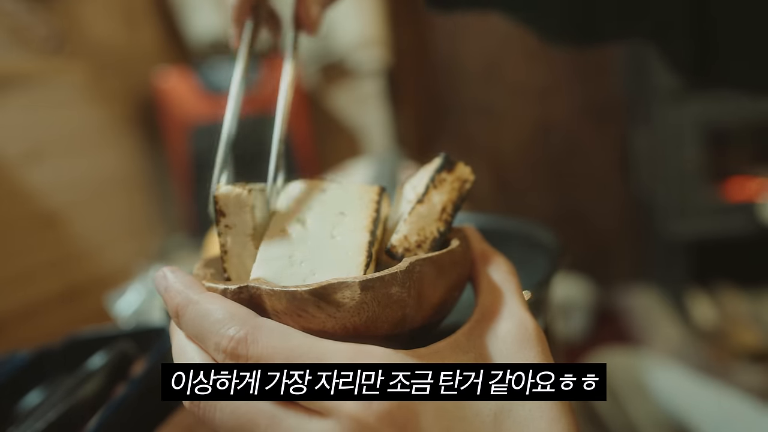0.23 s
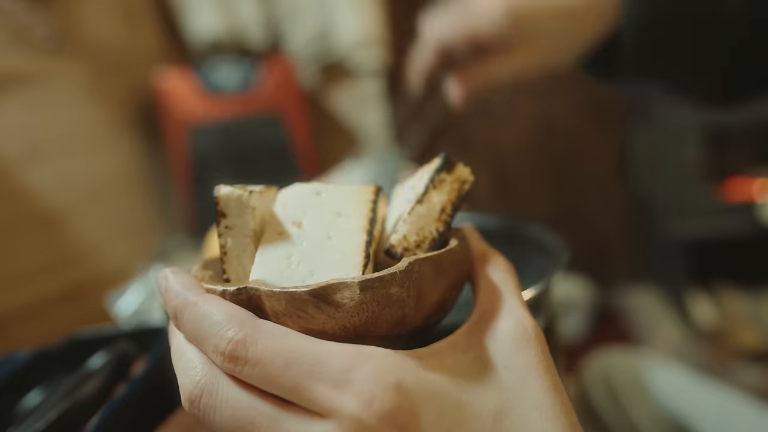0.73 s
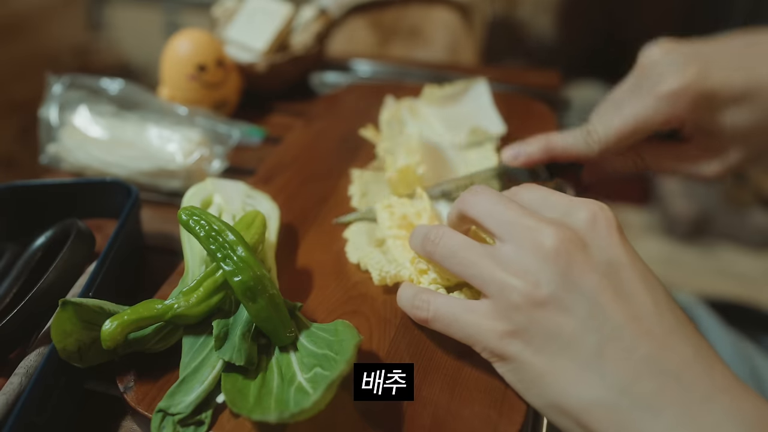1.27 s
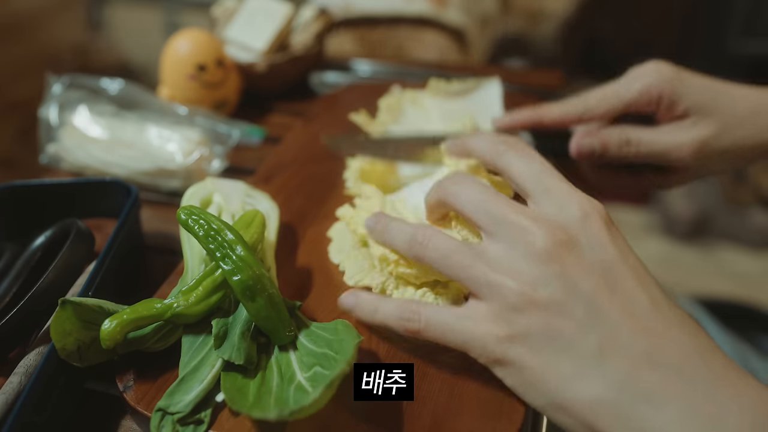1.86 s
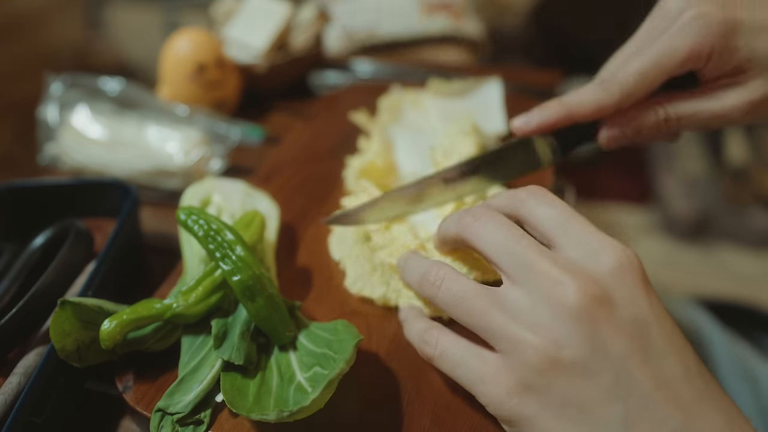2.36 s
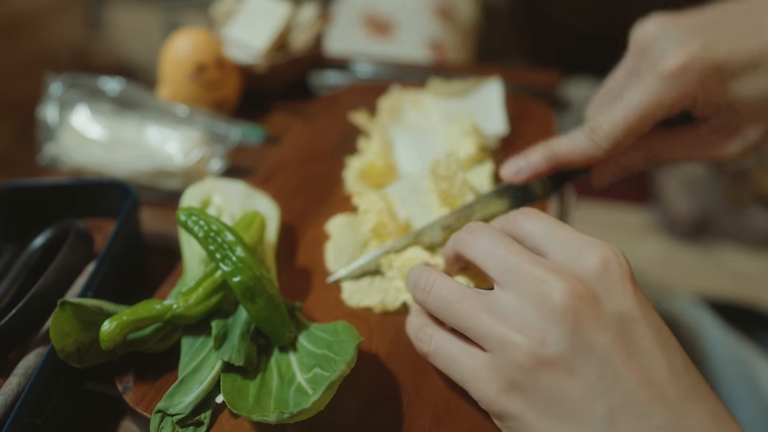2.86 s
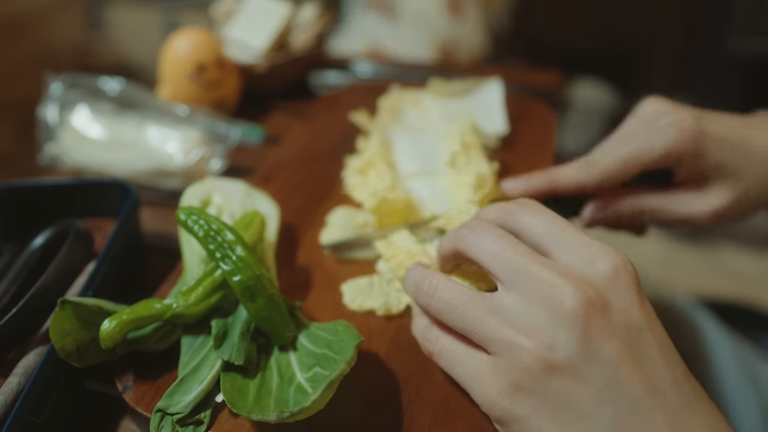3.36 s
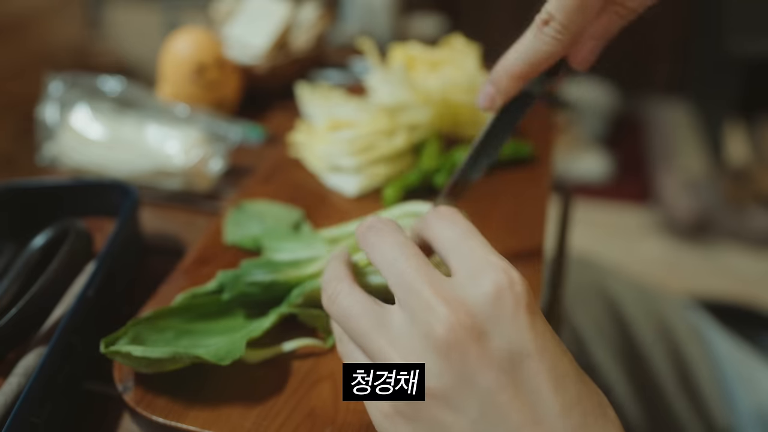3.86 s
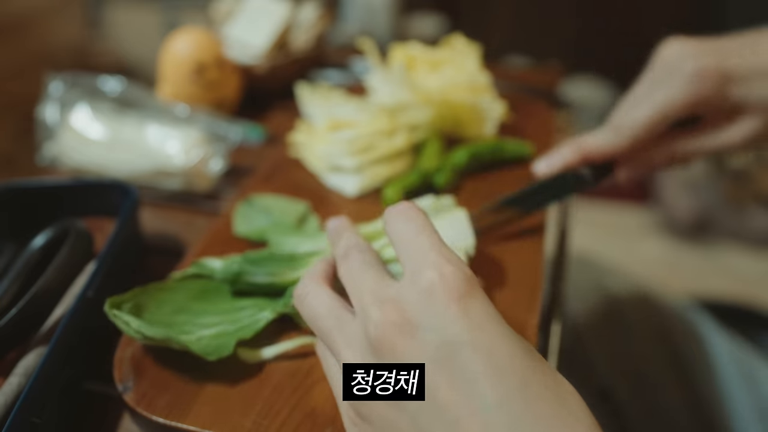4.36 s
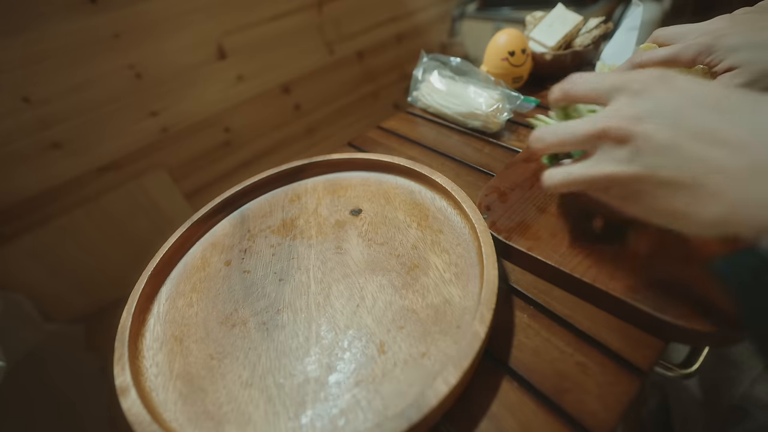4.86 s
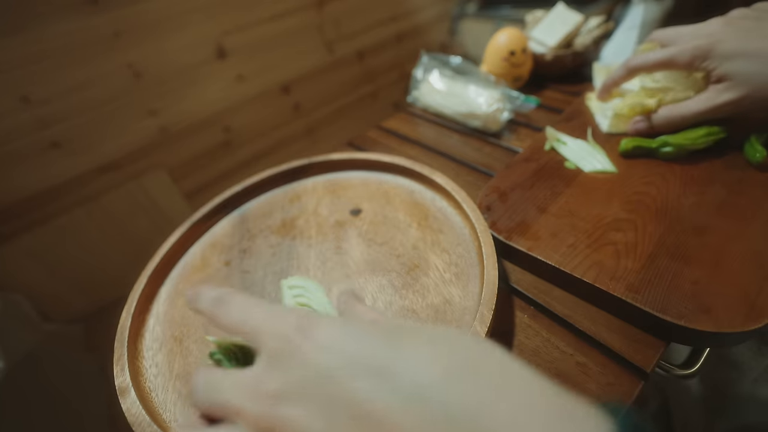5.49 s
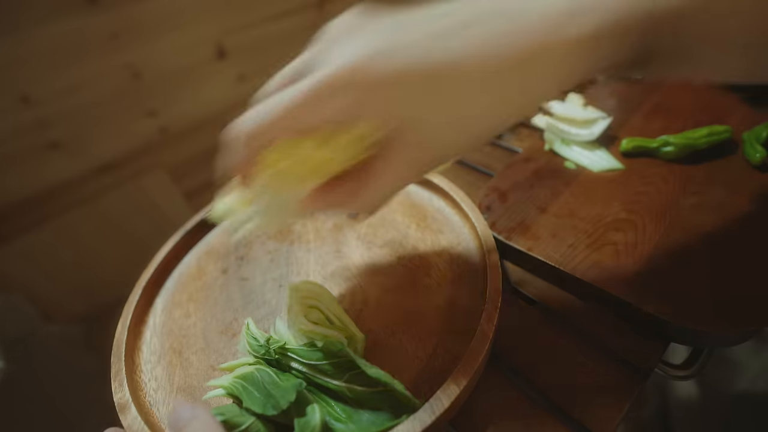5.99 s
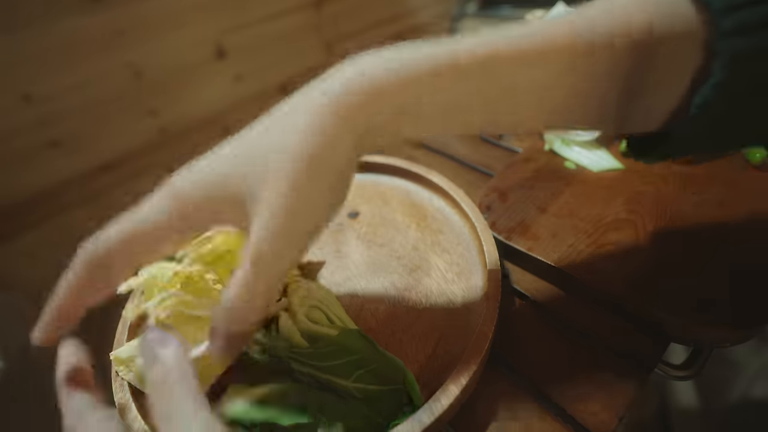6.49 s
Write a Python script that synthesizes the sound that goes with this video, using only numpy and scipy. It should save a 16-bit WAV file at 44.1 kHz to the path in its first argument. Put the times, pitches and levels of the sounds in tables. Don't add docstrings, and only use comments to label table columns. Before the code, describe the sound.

A close, dry microphone in a small kitchen with low rumble, soft hiss and faint motor whine. From 0 to 0.8 s steel tongs tick delicately, with tiny dry crumb cracks and a soft bowl tap near 0.36. At 0.9 a knife bites crisp cabbage: loud, dense, wet crackling until about 1.5, with light board knocks and low table boom. Smaller creaks fade by 1.9; a steel scrape marks 2.07, then faint cuts. At 2.7 a sharp snap and knock start another strong crunch lasting to 3.1. Quieter, brighter rasps through green stems build to a hard chop and knock at 3.8, then crunches and a solid, ringing board hit around 4.15. After 4.5 leaves rustle quietly as they are gathered. Around 5.45 to 5.55 a handful thumps softly on a wooden plate, a crisp rustle follows at 5.77, and sparse leafy crackles settle until 6.7.

```python
import sys
import numpy as np
from scipy import signal
from scipy.fft import rfft, irfft, next_fast_len
from scipy.io import wavfile
from scipy.ndimage import uniform_filter1d

SR = 44100
rng = np.random.default_rng(int(sys.argv[2]) if len(sys.argv) > 2 else 0)


def transcribe(signal):
    frames = np.atleast_2d(signal).T
    limited = np.clip(frames, -1, 1)
    pcm = np.round(limited * 32767).astype(np.int16)
    wavfile.write(sys.argv[1], SR, pcm)


def field_ratio(decibels):
    return 10 ** (np.asarray(decibels, dtype=float) / 20)


N = 296784


def unit(x):
    return x / np.sqrt(np.mean(x ** 2, axis=-1, keepdims=True) + 1e-20)


def along(points, hz):
    f, v = np.transpose(points)
    return np.interp(np.log(hz + 1), np.log(f + 1), v)


def curves(rows):
    start_s, *columns = np.transpose(rows)
    row = np.searchsorted(start_s, np.arange(N) / SR, side="right") - 1
    return [c[np.clip(row, 0, None)] for c in columns]


def filtered(x, response):
    size = next_fast_len(N + SR // 2)
    return irfft(rfft(x, size) * response(np.fft.rfftfreq(size, 1 / SR)), size)[..., :N]


def noise(spectrum):
    return unit(filtered(rng.standard_normal(N), lambda hz: field_ratio(along(spectrum, hz))))


def bump(hz, centre_hz, octaves):
    return np.exp(-(np.log2(hz / centre_hz) / octaves) ** 2)


def resonances(modes, mid_db=0, hard_db=0):
    def response(f):
        total = 0
        for k, (centre, width, db) in enumerate(modes):
            lift = field_ratio(along([(350, 0), (500, mid_db), (650, mid_db), (1200, hard_db)], centre))
            ring = 1j * f * width / (centre ** 2 - f ** 2 + 1j * f * width)
            total = total + (-1) ** k * field_ratio(db) * lift * ring
        return total
    return response


def placed(times_s, rows):
    at = np.round(np.asarray(times_s) * SR).astype(int)[:, None] + np.arange(rows.shape[1])
    return np.bincount(at.ravel(), rows.ravel(), N + SR)[:N]


def bursts(times_s, db, colour, t60_s, rise_s, size, peak=False):
    t = np.arange(size) / SR
    raw = rfft(rng.standard_normal((len(times_s), size)))
    tone = unit(irfft(raw * colour(np.fft.rfftfreq(size, 1 / SR) + 1), size))
    shaped = tone * field_ratio(-60 * t / t60_s) * (1 - np.exp(-t / rise_s))
    if peak:
        shaped = shaped / np.abs(shaped).max(axis=1, keepdims=True)
    return placed(times_s, field_ratio(db)[:, None] * shaped)


# blade bites in s, full pressure in s, crunch in dB, 20 dB fade in s,
# fizz above the crunch in dB.
CUTS = [(0.906, 0.942, -29.5, 0.17, -0.5), (1.121, 1.333, -23, 0.1479, -1), (1.529, 1.553, -35, 0.17, -11),
        (1.604, 1.832, -43.5, 0.1676, -1.5), (2.14, 2.195, -48.5, 0.02, -14.5), (2.294, 2.31, -54, 1, -6),
        (2.495, 2.715, -52, 0.53, 7), (2.721, 2.724, -26.5, 0.0661, -3.5),
        (2.845, 3.001, -22.5, 0.1024, -2.5), (2.99, 3.064, -23, 0.0156, -4),
        (3.144, 3.467, -43.5, 0.0714, 0), (3.529, 3.654, -41, -0.23, 5), (3.732, 3.79, -21.5, -0.0155, 2.5),
        (3.911, 4.077, -29.5, 0.2373, 1.5), (4.132, 4.134, -23.5, 0.07, 0),
        (4.153, 4.215, -31.5, 0.0935, 0), (4.286, 4.323, -39, -0.1, 6), (4.347, 4.5, -49.5, -0.26, 9.5)]
# grip in s, then the same columns.
GRIPS = [(0.011, 0.057, -51.5, 0.06, 5.5), (0.165, 0.238, -61.5, 0.26, 5), (0.723, 0.732, -60.5, 0.13, -14),
         (4.546, 4.636, -47, 0.51, -6), (5.043, 5.023, -48.5, 0.3461, -2.5), (5.332, 5.435, -48, 0.22, -3),
         (5.44, 5.723, -48, -0.22, 1), (5.768, 5.785, -37.5, 0.0661, -1), (5.927, 6.077, -54, 0.3143, -2.5),
         (6.2, 6.247, -42.5, 0.45, -2.5), (6.416, 6.465, -55, -0.2, 3), (6.71, 6.725, -51.5, -2.5, 5)]


def pressure():
    swell_db, bite_20db_s = 11, 0.015
    t = np.arange(0, N + 32, 32) / SR
    crunch = fizz = 1e-9
    for start, full, db, fade_s, fizz_db in CUTS + GRIPS:
        loss = swell_db * np.clip((full - t) / max(full - start, 0.002), 0, 1)
        loss = loss + 20 * np.maximum(start - t, 0) / bite_20db_s
        loss = loss + 20 * np.maximum(t - full, 0) / abs(fade_s)
        power = field_ratio(2 * (db - np.minimum(loss, 120)))
        crunch = crunch + power
        fizz = fizz + power * field_ratio(2 * fizz_db)
    return [np.interp(np.arange(N) / SR, t, np.sqrt(power)) for power in (crunch, fizz)]


# start in s, sliding share 0-1, smoothness 0-1, blade singing in dB,
# room hiss in dB.
STAGES = [(0, 0, 0.42, -30, -54.5), (.89, 0.23, 0.24, -22, -64.5), (1.5, 0, 0.15, -24.5, -64),
          (1.9, 0.15, 0.29, -15, -72.5), (2.29, 0.25, 0.15, -24, -90), (2.84, 0.07, 0.13, -17, -83.5),
          (2.95, 0.07, 0.23, -11.5, -83), (3.3, 0.7, 0, -28, -88.5), (3.77, 0.9, 0.5, -9, -87),
          (3.87, 0.85, 0.45, -24, -85.5), (4.165, 0.2, 0.23, -2.5, -85.5), (4.27, 0.16, 0, -24, -84.5),
          (4.55, 0.04, 0, -33.5, -64.5), (5.44, 0.29, 0, -29, -68), (5.86, 0.09, 0.02, -19.5, -67)]
# start in s, peak in dB.
JOLTS = [(1.263, -30.5), (1.501, -35), (2.071, -37.5), (2.742, -32), (2.984, -29), (3.34, -36.5),
         (3.62, -32), (3.799, -16.5), (4.147, -26), (4.8, -42), (5.251, -40), (5.47, -30.5)]
# frequency in Hz, density in dB per Hz.
ROOM_HISS = [(82, -52.5), (140, -0.5), (264, -6), (1000, -11.5), (3580, -35), (4910, -26.5), (13800, -27),
             (16500, -25.5)]
# frequency in Hz, level in dB.
MOTOR_TONES = [(6751, -73), (13501, -76.5), (14250, -79)]
# table boom in dB, room rumble in dB; bowl held up, then at the board.
STILL_DB = [(-49, -47), (-68.5, -61.5)]
LEAN_DB = (-23.5, -18.5)
SWAY_DB = (-5, -13.5)


def kitchen(crunch):
    lag_s, lean_s, sway_t60_s, board_s = 0.057, 0.19, 0.61, 0.89
    hiss_db = curves(STAGES)[3]
    t = np.arange(N) / SR
    late = np.roll(crunch, int(lag_s * SR))
    lean = np.abs(uniform_filter1d(late ** 2, int(lean_s * SR) + 1))
    sway = sum(field_ratio(2 * (db - 60 * np.abs(t - s) / sway_t60_s)) * (t > s) for s, db in JOLTS)
    still = field_ratio(2 * np.where(t < board_s, *np.array(STILL_DB)[:, :, None]))
    power = still + np.outer(field_ratio(LEAN_DB) ** 2, lean) + np.outer(field_ratio(SWAY_DB) ** 2, sway)
    boom_gain, rumble_gain = np.sqrt(power)
    boom = noise([(18, -23), (28, 6.5), (38, 12.5), (48, 9), (60, -49.0)])
    rumble = noise([(45, -46.0), (58, 0.5), (95, -12.5), (125, -10.5), (160, -18), (300, -47.5)])
    whine = sum(field_ratio(db - 0.5) * np.sin(2 * np.pi * hz * t) for hz, db in MOTOR_TONES) * (t < board_s)
    return boom_gain * boom + rumble_gain * rumble + field_ratio(hiss_db) * noise(ROOM_HISS) + whine


# frequency in Hz, density in dB per Hz.
CRUNCH = [(410, -36), (830, -7.5), (1440, -9), (2400, -2), (4520, -5.5), (8000, -8), (10400, -64)]
FIZZ = [(3240, -31), (5500, 2.5), (7350, 5), (13800, 5.5), (15800, 1), (16600, -21)]
RASP = [(530, -31), (1000, -22.5), (2340, -8.5), (4370, 8.5), (6180, -6), (9000, -13.5), (11700, -28.5),
        (16000, -93.5)]
# frequency in Hz, width in Hz, level in dB.
BOARD = [(225.2, 31, 4), (525, 39, -3), (1050, 120, -15), (1535, 160, -21), (2110, 130, -8)]
PLATE = [(195, 55, -5.5), (338.6, 33.6, 1.5), (573.5, 28, 2), (694, 30.7, -9), (853, 44, -8.5),
         (1300, 104, -14), (1535, 80, -13), (2100, 310, -22.5)]


def leaves(crunch, fizz):
    board_rub_db, plate_rub_db, scuff_db = -19, -18, -19.5
    slide, smooth, sing_db, _ = curves(STAGES)
    luck = rng.random((5000, 4))
    at = (luck[:, 0] * N).astype(int)
    size_db = -4 * np.log(luck[:, 1] + 0.012)
    lean_db = 14 * (luck[:, 2] - 0.5)
    pitch_db = 15 * (luck[:, 3] - 0.5)
    age = np.arange(SR // 50) / SR

    def level(x):
        return x / np.sqrt(np.abs(uniform_filter1d(x ** 2, SR // 12)) + 1e-9)

    def grain(db, t60_s):
        fade = field_ratio(-60 * age / t60_s) * (1 - np.exp(-age / 0.00063))
        cracks = level(signal.fftconvolve(np.bincount(at, field_ratio(db), N), fade)[:N])
        return level(smooth + (1 - smooth) * cracks)

    body = np.sqrt(1 - slide) * noise(CRUNCH) + np.sqrt(slide) * noise(RASP)
    deep = filtered(body, lambda f: 1 / (1 + (f / 3200) ** 6))
    dull = grain(size_db - lean_db - pitch_db, 0.024) * deep
    dull = dull + grain(size_db + pitch_db, 0.01) * (body - deep)
    spray = noise(FIZZ)
    top = filtered(spray, lambda f: 1 / (1 + (9500 / (f + 1)) ** 8))
    bright = grain(size_db + lean_db - pitch_db, 0.0079) * (spray - top)
    bright = bright + grain(size_db + lean_db, 0.012) * top

    force = grain(size_db, 0.021) * rng.standard_normal(N)
    blade = unit(filtered(force, resonances([(2110, 75, 0)])))
    board = unit(filtered(force, resonances(BOARD[:1])))
    plate = unit(filtered(force, resonances(PLATE[:2])))
    on_board = np.arange(N) < 4.45 * SR
    low = np.where(on_board, field_ratio(board_rub_db) * board, field_ratio(plate_rub_db) * plate)
    scuff = unit(filtered(force, lambda f: bump(f + 1, 444, 0.79)))
    rub = (1 + 2.56 * slide) * low + field_ratio(scuff_db) * (2 - slide) * scuff
    return field_ratio(-2.5) * (crunch * (dull + field_ratio(sing_db) * blade + rub) + fizz * bright)


# start in s, peak in dB, centre in Hz, brightness in dB.
CRUMBS = [
    (0.0418, -28, 3109, -17),
    (0.1728, -27, 6631, -19.5),
    (0.222, -36, 4270, 3.5),
]
FIRST_RIBS = [(0.9004, -18, 3420, -13), (0.902, -20, 4660, -17.5), (0.9162, -16.5, 2110, -7.5),
              (0.9436, -3, 9820, -18.5), (0.998, -13, 11600, -12), (1.0104, -17, 1200, -15),
              (1.0097, -6, 2000, -17), (1.017, -10.5, 4270, -3), (1.0611, -18, 5840, -9.5),
              (1.0979, -24, 5700, -15.5), (1.1116, -16, 2560, -12.5), (1.1327, -6.5, 5090, -21),
              (1.1563, -13, 3760, -12), (1.1692, -18, 7280, -2), (1.1698, -7, 2104, -12),
              (1.1887, -9, 4700, -21), (1.2017, -8.5, 2060, -16.5), (1.2165, -4, 2360, -22),
              (1.259, -3, 3900, -13), (1.278, -10.5, 4110, -20), (1.2973, -7.5, 4450, -13.5),
              (1.3152, -6, 3900, -15), (1.3495, -8.5, 2860, -17.5), (1.3744, -4.5, 2600, -20),
              (1.4531, -11, 4180, -13.5), (1.463, -12.5, 8670, -14)]
SPLITS = [(1.2264, -7.5, 2800, -12), (1.3026, -4, 4460, -15), (1.5464, -18, 5800, -19),
          (1.5514, -12.5, 2680, -9), (1.5675, -17, 1826, -15), (1.6254, -21, 5050, -18),
          (1.938, -34, 1980, -17), (2.9241, -5.5, 2700, -11), (2.9698, -2.5, 2050, -16),
          (3.0308, -6.5, 2320, -17), (4.2934, -14.5, 4420, -15), (4.6769, -25, 4290, -16.5),
          (6.716, -34, 2780, -18)]
CREAKS = [(1.5357, -38.5, 1200, 1.5), (1.5365, -14.5, 5730, -13.5), (1.5602, -13, 5115, -7.5),
          (1.5927, -30, 1780, -18.5), (1.6174, -20, 4340, -17.5), (1.6575, -24.5, 4590, -21),
          (1.6893, -32, 1880, -19.5), (1.7198, -30.5, 2100, -20), (1.753, -30, 2650, -17),
          (1.7797, -33.5, 2680, -13), (1.8015, -32, 8290, -10.5), (1.8285, -21.5, 4600, -11),
          (1.8361, -23.5, 4230, -19), (1.9282, -51, 1200, -5), (1.9287, -28.5, 1840, -17.5),
          (1.9962, -29.5, 5900, -22), (2.0196, -39.5, 4960, -16.5), (2.064, -24, 1816, -53)]
SECOND_RIBS = [(2.1548, -30, 2070, -23), (2.1884, -35, 1990, -31), (2.1972, -34.5, 2370, -29),
               (2.2994, -40, 2980, -17.5), (2.3096, -37.5, 4270, -21), (2.3382, -38.5, 4610, -14.5),
               (2.345, -29, 3400, -14), (2.4235, -43.5, 2360, -19), (2.4216, -33, 2070, -33),
               (2.502, -31, 6860, -10), (2.5093, -38, 10900, -9.5), (2.5083, -27.5, 2020, -12),
               (2.5756, -26.5, 5580, -21.5), (2.591, -20, 2270, -14.5), (2.608, -24, 9170, -16),
               (2.6726, -47, 1200, 3.5), (2.6726, -31, 4310, -12.5), (2.69, -21.5, 2000, -1),
               (2.727, 1, 2140, -12.5), (2.782, -24, 4170, -12), (2.8168, -29, 7750, -11.5),
               (2.8306, -20.5, 2100, -7.5), (2.843, -9, 1930, -16.5), (2.8609, -7, 4400, -15.5),
               (2.877, -5.5, 2030, -8), (2.8984, -7.5, 7340, -19), (2.902, -7, 4120, -16.5),
               (2.9182, -2, 2050, -16.5), (2.941, -3, 2470, -12), (2.9574, 2, 2060, -11),
               (2.9918, -2, 2080, -13.5), (3.0165, -5, 2160, -8.5), (3.128, -33.5, 4980, -22),
               (3.139, -24, 4940, -27), (3.1953, -32.5, 11600, -13), (3.2066, -27, 7470, -12.5)]
STEMS = [(3.2085, -30.5, 7470, -13), (3.2612, -28.5, 6530, -14), (3.262, -22, 4730, -19),
         (3.2963, -26, 9130, -6), (3.314, -20, 10550, -9.5), (3.361, -20.5, 5700, -10),
         (3.388, -18.5, 5630, -16.5), (3.4564, -19, 2730, -23.5), (3.5148, -42.5, 4770, 2.5),
         (3.5283, -25, 8110, -13), (3.5735, -19.5, 10970, -11), (3.6114, -25.5, 9570, -8),
         (3.612, -16.5, 5660, -15.5), (3.6357, -22, 3420, -13), (3.6468, -14.5, 3640, -9.5),
         (3.7232, -16.5, 3640, -11.5), (3.73, -16.5, 3910, -11.5), (3.7548, -16.5, 3430, -13.5),
         (3.7611, -10.5, 3200, -10), (3.769, -6.5, 10200, -13.5), (3.8793, -23, 7400, -14),
         (3.9178, -36, 4220, -6), (3.932, -24, 3360, -11), (3.9516, -22.5, 3890, -10.5),
         (3.9653, -12.5, 4230, -16), (3.9835, -9, 4100, -8.5), (4.012, -14.5, 11050, -13),
         (4.0542, -18, 4510, -11), (4.076, -15.5, 3680, -12), (4.1352, -3, 4270, -16.5),
         (4.1457, -4, 1990, -24), (4.1868, -10.5, 2130, -11), (4.2847, -13, 10000, -12.5),
         (4.2871, -12.5, 4520, -15), (4.3147, -14.5, 9360, -14.5), (4.3732, -28.5, 5820, -12)]
GATHER = [(4.3733, -27, 5860, -15.5), (4.4036, -30, 9100, -8), (4.4397, -24, 9200, -11.5),
          (4.4886, -19.5, 9230, -3), (4.521, -32, 1560, -12.5), (4.6412, -29, 4090, -27.5),
          (4.6614, -23.5, 4300, -27), (4.6971, -20.5, 4090, -11), (4.759, -30, 1300, -24.5),
          (4.765, -30, 1460, -28), (4.846, -24.5, 1910, -16), (4.9121, -40, 8840, -5),
          (5.0178, -34, 7990, -8), (5.0248, -29, 12060, -11), (5.0253, -27, 6800, -11),
          (5.0694, -23.5, 8270, -9), (5.0954, -32.5, 3170, -10), (5.1205, -26.5, 10100, -10),
          (5.1765, -37.5, 4380, -10), (5.3334, -43, 8890, -13), (5.365, -41.5, 1800, -19.5),
          (5.365, -35, 1609, -25), (5.393, -33.5, 1490, -18), (5.4148, -32, 3340, -13),
          (5.4273, -19, 5760, -11), (5.4536, -31, 1210, -15.5)]
SETTLE = [(5.5623, -25.5, 4720, -23), (5.6136, -35, 2210, -15.5), (5.6281, -28, 11800, -14.5),
          (5.66, -25.5, 3670, -27), (5.687, -37, 8760, -14), (5.7088, -30, 7760, -18),
          (5.7268, -30, 6300, -13), (5.7318, -34, 6490, -11), (5.7722, -17.5, 6590, -19),
          (5.7844, -14.5, 5120, -18), (5.7907, -14, 7360, -17), (5.9504, -40.5, 2670, -6),
          (6.0024, -34, 3700, -10), (6.0224, -28, 4240, -9.5), (6.0508, -30, 7860, -10),
          (6.0741, -26, 9480, -16), (6.1145, -34.5, 3610, -13), (6.1876, -37, 2535, -19),
          (6.201, -26, 3860, -19.5), (6.2197, -26, 4420, -17), (6.2737, -27, 4330, -16.5),
          (6.2873, -18.5, 3430, -17), (6.353, -20.5, 4240, -16.5), (6.4335, -29.5, 4100, -14),
          (6.582, -30.5, 2900, -18.5), (6.6223, -32.5, 4080, -14.5), (6.6732, -38, 8820, -9),
          (6.6947, -47.5, 11960, 2), (6.7106, -35.5, 9810, 0.5), (6.7115, -27, 2800, -5)]


def snaps():
    rows = CRUMBS + SPLITS + FIRST_RIBS + CREAKS + SECOND_RIBS + STEMS + GATHER + SETTLE
    s, db, hz, bright_db = np.transpose(rows)[:, :, None]

    def colour(f):
        pitch = bump(f, hz, 0.18) + 0.47 * bump(f, 3040, 1.49)
        return pitch + 1.39 * field_ratio(bright_db) * bump(f, 10377, 0.97)

    t60_s = 0.0065 * (4000 / hz) ** 0.2
    crack = bursts(s[:, 0], db[:, 0] - 1.5, colour, t60_s, rise_s=0.00023, size=1024, peak=True)
    sing_db = curves(STAGES)[2]
    return crack + filtered(field_ratio(sing_db + 13.5) * crack, resonances([(2100, 100, 0.01)]))


# start in s, level in dB, centre in Hz, t60 in s.
SCRAPES = [(0.043, -17.5, 920, 0.08), (1.3, -17.5, 1763, 0.132), (1.749, -26, 902, 0.2),
           (1.79, -28, 880, 0.083), (2.064, -8.5, 1790, 0.14), (2.086, -5, 1298, 0.044),
           (3.368, -22, 870, 0.16), (4.524, -24.5, 1300, 0.1), (4.64, -23, 1500, 0.025),
           (4.659, -17, 1750, 0.025), (4.675, -21, 1300, 0.025), (4.696, -20, 1400, 0.026),
           (4, -19, 1546, 0.06), (6.61, -29.5, 1176, 0.18)]


def scrapes():
    s, db, hz, t60_s = np.transpose(SCRAPES)[:, :, None]

    def colour(f):
        return (2.62 * bump(f, hz, 0.18) + bump(f, 1140, 3.2)) / (1 + (f / 4600) ** 4)

    return bursts(s[:, 0], db[:, 0] - 16.0, colour, t60_s, rise_s=0.0023, size=8192)


# start in s, peak in dB, strongest frequency in Hz.
TONGS = [
    (0.0433, -31.5, 2800),
    (0.2182, -33.5, 3820),
    (0.3618, -43, 3020),
    (0.4444, -49, 3650),
    (0.5127, -43.5, 4442),
    (0.7233, -45.5, 2655),
]
# frequency in Hz, width in Hz, level in dB.
STEEL = [(900, 90, -12), (2466, 490, 4), (3020, 240, 0), (3650, 63, 1.5), (4230, 160, 3.5), (6000, 70, 2)]


def tongs():
    s, db, hz = np.transpose(TONGS)[:, :, None]
    touch = bursts(s[:, 0], db[:, 0] - 10, lambda f: bump(f, hz, 0.914),
                   t60_s=0.17, rise_s=0.00122, size=4096)
    return 0.63 * touch + field_ratio(2.5) * filtered(touch, resonances(STEEL))


def blows(rows, modes, contact_s, push_db):
    t = np.arange(SR // 5) / SR
    f = np.fft.rfftfreq(len(t), 1 / SR)
    rough = rng.standard_normal((len(rows), len(t)))
    drag = 0.15 * field_ratio(-0.3 * np.array(rows)[:, 3:])
    rattle = np.exp(-t / 0.025) * uniform_filter1d(rough, size=30, axis=1) * 2.35
    push = np.exp(-t / contact_s) * (1 + 0.72 * rough) + drag * rattle
    spot = rng.standard_normal((len(rows), len(modes), 2))
    rings = []
    for p, luck, (_, _, mid_db, hard_db) in zip(push, spot, rows):
        here = [(hz * (1 + 0.018 * a), width, db + 3.0 * b)
                for (hz, width, db), (a, b) in zip(modes, luck)]
        here.append((380, 450, -14))
        response = resonances(here, mid_db + 4, hard_db + push_db)(f)
        rings.append(irfft(rfft(p) * response, len(t)))
    peaks = field_ratio([row[1] for row in rows]) / np.abs(rings).max(axis=1)
    return placed([row[0] for row in rows], rings * peaks[:, None])


# start in s, peak in dB, middle ring in dB, hardness in dB.
DROPS = [(0.358, -29.5, -6, 4), (2.065, -42.5, -5.5, 14.5), (3.38, -32, -11, -3.5),
         (4.529, -34.5, -23, -11), (4.56, -39.5, -15, -36), (4.769, -34.5, -21, -20),
         (4.843, -27.5, 3, -22), (5.058, -39.5, -16, -32), (5.454, -14.5, -0.5, -9), (5.461, -19, 2, -2),
         (5.505, -15, 0, -14.5), (5.524, -19, 1, -20), (5.543, -26.5, -8, -25), (5.588, -32, -12.5, -36),
         (5.687, -39, -18.5, -34), (5.772, -38, -18, -21), (5.855, -44, -1, -22.5), (6.27, -44, 9, -22.5),
         (6.49, -45, 1, -28)]


def plate_drops():
    return blows(DROPS, PLATE, contact_s=0.0053, push_db=5.0)


# start in s, peak in dB, middle ring in dB, hardness in dB.
KNOCKS = [(0.947, -21, -47.5, -10), (1, -23, -25.5, -17), (1.028, -26.5, 10, -16.5),
          (1.176, -20.5, 10, -3.5), (1.217, -21.5, -14, -20), (2.728, -12, -12.5, -9),
          (2.78, -36, 3.5, -30), (2.848, -28.5, -12, -24), (2.961, -21.5, -4, -34),
          (3.532, -42.5, -40, -34.5), (3.577, -36, -46.5, -31.5), (3.614, -22.5, -36, -39.5),
          (3.65, -24.5, -39.5, -35), (3.722, -27, -37, -37), (3.788, -9.5, -3.5, -7.5),
          (4.136, -15.5, -2, -3), (4.146, -6, 11.5, -2), (4.298, -30, -21, -22)]


def board_knocks():
    return blows(KNOCKS, BOARD, contact_s=0.00318, push_db=19.0)


def table():
    s, db = np.transpose(JOLTS)
    t = np.arange(SR // 2) / SR
    rock = np.sin(2 * np.pi * 37 * t) * field_ratio(-60 * t / 0.567) * (1 - np.exp(-t / 0.059))
    return placed(s, field_ratio(db)[:, None] * rock)


def room(near):
    t60_s, delay_samples = 0.08, 200
    t = np.arange(SR // 4) / SR
    tail = rng.standard_normal(len(t)) * field_ratio(-60 * t / t60_s)
    late = np.pad(near, (delay_samples, 0))
    return field_ratio(-11.5) * signal.fftconvolve(late, tail / np.linalg.norm(tail))[:N]


def scene():
    crunch, fizz = pressure()
    near = leaves(crunch, fizz) + snaps() + scrapes() + tongs()
    near = near + plate_drops() + board_knocks()
    return (near + room(near) + table() + kitchen(crunch))[None]


def top_cut(x):
    return signal.sosfilt(signal.butter(12, 16990, fs=SR, output="sos"), x)


def record(dry):
    limit, band_hz = 0.8, 15950
    rounded = dry / (1 + np.abs(dry / limit) ** 4) ** 0.25
    mix = filtered(rounded, lambda hz: np.where(hz < band_hz, 1, field_ratio(-43.5)))
    return top_cut(mix)


dry = scene()
out = record(dry)
transcribe(out)
```